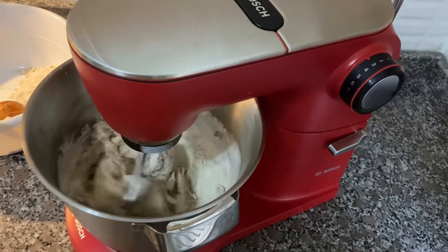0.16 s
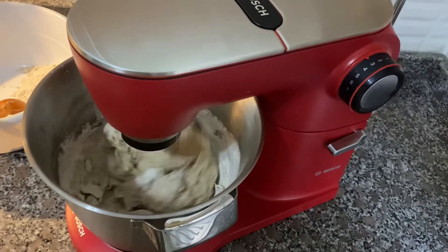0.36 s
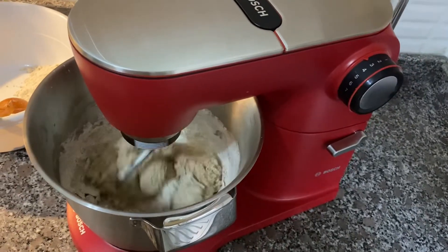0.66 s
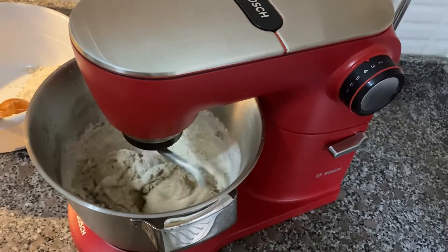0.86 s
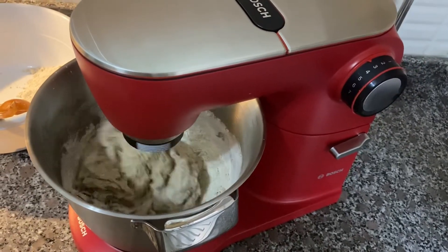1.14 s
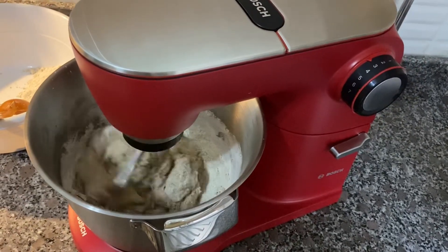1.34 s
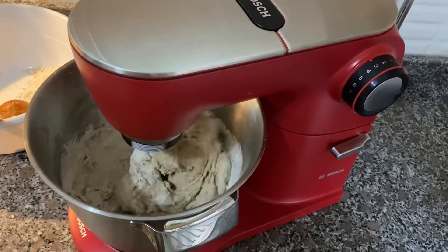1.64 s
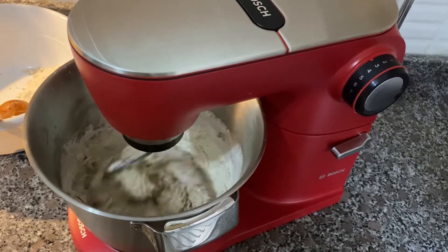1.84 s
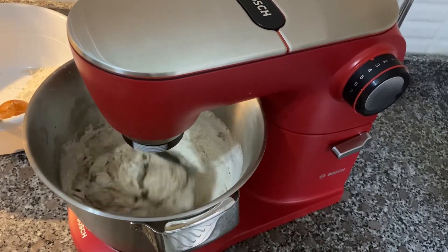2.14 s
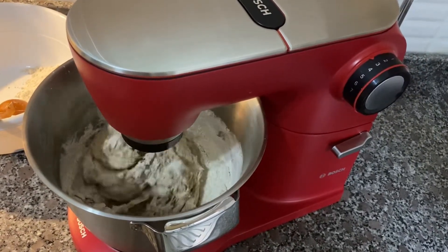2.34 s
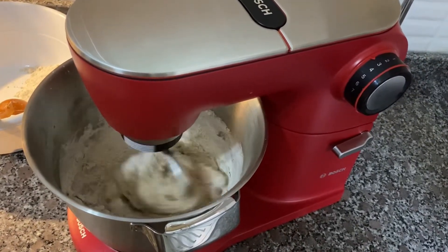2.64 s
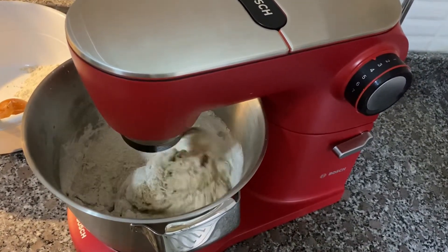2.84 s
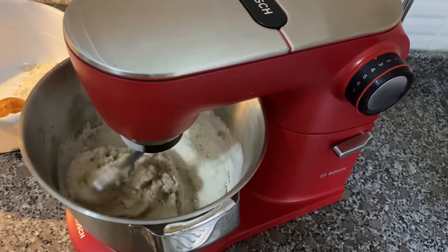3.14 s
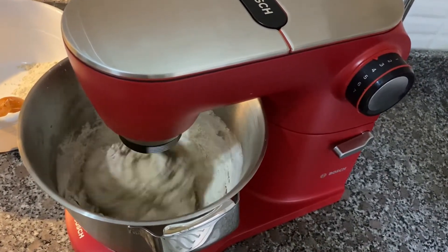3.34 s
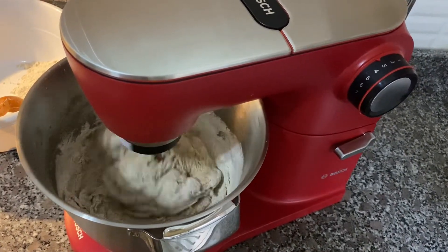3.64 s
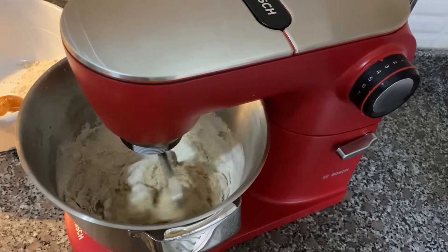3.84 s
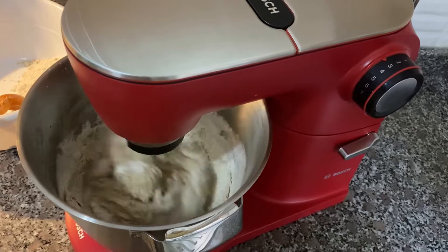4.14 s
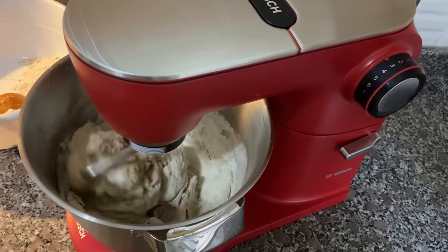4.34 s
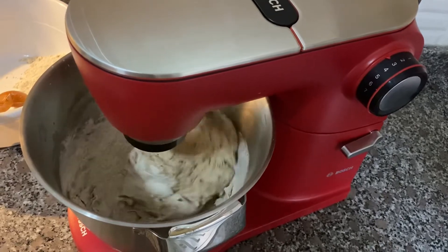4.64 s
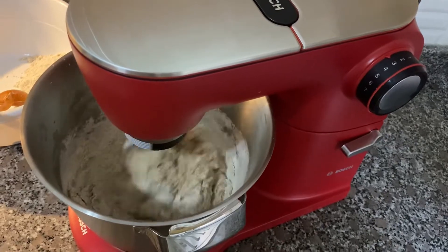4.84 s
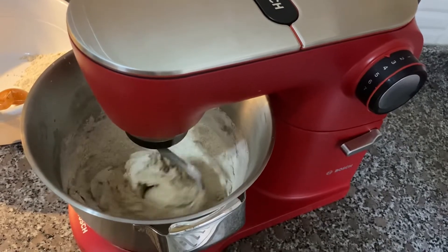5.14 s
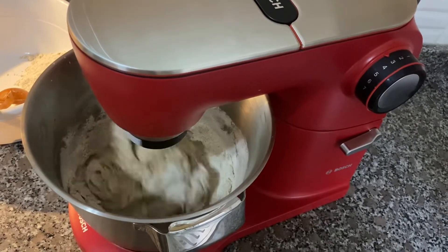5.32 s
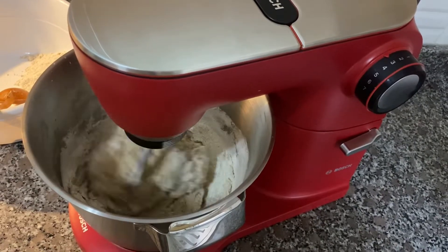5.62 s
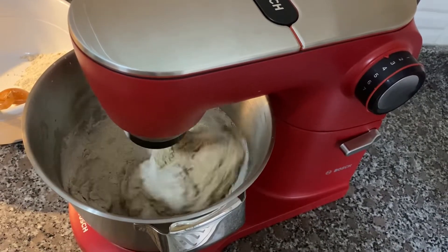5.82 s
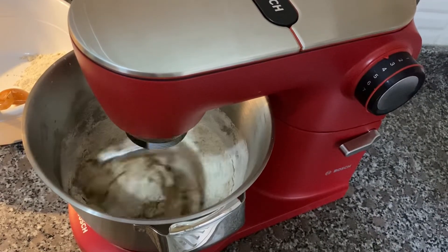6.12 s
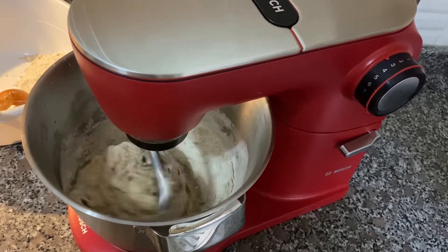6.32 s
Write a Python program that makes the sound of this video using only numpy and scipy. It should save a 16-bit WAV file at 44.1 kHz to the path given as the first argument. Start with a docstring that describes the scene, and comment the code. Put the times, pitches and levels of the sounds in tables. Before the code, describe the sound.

Close-up electric mixer whining at high pitch, sagging and recovering irregularly as heavy dough loads the motor, with low throb and faint bowl ticks.

```python
"""The gear whine of a kitchen stand mixer kneading stiff dough in a steel bowl, heard from just above its head.
Each bite of the hook slows the motor and lowers the whine, which usually swells; when the dough lets go, it rises.
Shaft-locked sines make whine and throb, steady sines the mains hum, and band-shaped noise the gear rattle,
cooling air, brush hiss and soft dough thuds. Damped resonances ring as a few ticks."""
import sys
import numpy as np
from scipy.fft import rfft, irfft, next_fast_len
from scipy.io import wavfile
from scipy.ndimage import map_coordinates

SR = 44100
rng = np.random.default_rng(int(sys.argv[2]) if len(sys.argv) > 2 else 0)


def wav_out(sig):
    """Save sig, one row per channel (or a flat mono array), as 16-bit PCM at SR to the path in sys.argv[1]."""
    wavfile.write(sys.argv[1], SR, np.round(np.clip(np.atleast_2d(sig).T, -1, 1) * 32767).astype(np.int16))


N = 285315  # length in samples

TEETH = 46  # tooth meshes per shaft turn
RIPPLE_HZ = 100  # ripple of the mains current
CHANGE_S = 0.031  # length of a rise or dip
# Likeness of the two sides over frequency: hz, correlation
ALIKE = [(45, 0.64), (100, 0.72), (300, 1), (550, 0.9), (1000, 0.041), (2000, 0.21), (4000, 0.87),
         (6500, 0.053), (9000, 0.033)]
# Phase by which the left side leads: hz, lead_rad
LEAD = [(100, 0.098), (300, -0.25), (550, -0.77), (2000, -0.95), (5500, -1.1), (7000, -0.42)]
# Brief rises and dips of the rattle and the main hum: centre_s, rattle_change_db, main_hum_change_db
BRIEF_CHANGES = [(.11, 5, 5), (.17, 3, 10), (.8, -3, 2.5), (1.08, 2, 6), (1.24, 3.5, -1), (1.3, 5, 6),
                 (1.66, 3, -7), (1.901, 0.5, 9), (2.02, -5, 6), (2.43, 4.5, -5), (2.78, 2, 7), (3.16, 2, 8),
                 (3.359, 6, -1), (3.94, 3, 1), (4.34, 7, -6), (4.63, 3, -3), (5.06, 5, 10), (6.21, -3, 8.5)]


def amp(db):
    """Decibels to gain: 20 dB is a factor of ten in pressure."""
    return 10 ** (np.asarray(db) / 20)


def unit(x):
    """Normalisation to a root-mean-square of 1."""
    return x / np.sqrt(np.mean(x ** 2) + 1e-20)


def along(points, hz):
    """Interpolation of (hz, value) points on a logarithmic frequency axis."""
    f, v = np.transpose(points)
    return np.interp(np.log(hz + 1), np.log(f + 1), v)


def curves(rows):
    """Linear interpolation in time: one value per sample for each column after the time."""
    s, *cols = np.transpose(rows)
    return [np.interp(np.arange(N) / SR, s, c) for c in cols]


def wobble(rate):
    """Band-limited random modulation: a smooth curve through `rate` random knots a second."""
    knots = rng.standard_normal(N // 20)
    return map_coordinates(knots, [np.arange(N) * rate / SR], mode="wrap")


def bell(s, length):
    """Gaussian pulse of height 1 centred at s; `length` is its width in seconds at 1/e of the height."""
    return np.exp(-(2 * (np.arange(N) / SR - s) / length) ** 2)


def filtered(x, response):
    """Linear filtering: the spectrum of x times a response of frequency."""
    m = next_fast_len(N + SR // 4)
    return irfft(rfft(x, m) * response(np.fft.rfftfreq(m, 1 / SR)), m)[..., :N]


def sides(lean_db):
    """Interaural level difference: left and right gains, a positive lean being louder on the left."""
    return amp(np.array([lean_db, -lean_db]).reshape(2, -1) / 2)


def tone(turns, lean_db, lead):
    """Stereo sine, rms 1 before the lean, from its phase in turns; the left side leads by `lead` radians."""
    phase = 2 * np.pi * turns + lead * np.array([[.5], [-.5]])
    return np.sqrt(2) * sides(lean_db) * np.sin(phase)


def spread(pair, spectrum):
    """Partial coherence: two unrelated signals, coloured and mixed to a stereo field of rms 1."""
    # Left-right level difference: hz, lean_db
    lean_points = [(50, -3), (150, -4), (300, 0.5), (600, -7.5), (2000, -2), (4800, -5), (6500, 1.5)]

    def shape(hz):
        turn = np.arccos(np.clip(along(ALIKE, hz), -1, 1)) / 2
        return amp(along(spectrum, hz)) * [np.cos(turn), np.sin(turn)]

    def place(hz):
        return sides(along(lean_points, hz)) * np.exp(1j * along(LEAD, hz) * np.array([[.5], [-.5]]))

    mid, side = filtered(pair, shape)
    return unit(filtered(np.array([mid + side, mid - side]), place))


def late_right(x, stray_db=-16):
    """Time-of-arrival difference: x[0] reaches the right late; unrelated x[1] adds faint opposed scatter."""
    lag_s = 0.0001643
    opposed = np.array([[1], [-1]])
    direct = filtered(x[0], lambda hz: np.exp(1j * np.pi * hz * lag_s * opposed))
    return direct + amp(stray_db) * x[1] * opposed


def kneading():
    """Load slip: each bite drags the tooth-mesh rate (Hz) down and changes the whine's level (dB)."""
    free_hz = 2023.8  # tooth-mesh rate while the hook runs free
    # Bites of the hook into the dough: hardest_pull_s, length_s, mesh_sag_hz, whine_swell_db
    bites = [(0.0, 0.22, 123.8, 4), (0.443, 0.25, 128, 1), (0.788, 0.32, 156.1, 3), (1.161, 0.25, 79.8, 2),
             (1.52, 0.2, 131.6, 3), (1.832, 0.25, 109.2, 3), (2.055, 0.14, 88.5, 1.5),
             (2.363, 0.49, 127.6, 6.5), (2.733, 0.53, 103.7, -1.5), (3.102, 0.22, 140.2, 9.5),
             (3.379, 0.39, 112.2, 3), (3.87, 0.3, 139.8, 5.5), (4.161, 0.34, 146.7, 10),
             (4.335, 0.22, 84.06, 3.5), (4.738, 0.4, 96, 0.5), (5.085, 0.19, 116.9, 6.5),
             (5.447, 0.62, 166.4, 8.5), (5.82, 0.28, 91.96, 4), (6.225, 0.39, 162.1, 7.5)]
    mesh_hz, swell_db = np.full(N, free_hz), np.zeros(N)
    for s, length, sag_hz, db in bites:
        pull = bell(s, length)
        mesh_hz = mesh_hz - sag_hz * pull
        swell_db = swell_db + db * pull ** 2
    return mesh_hz, swell_db


def surging():
    """Periodic strain: the gear train's level (dB) surges once a hook turn, shudders, and briefly rises or dips."""
    hook_hz, first_surge_s, surge_depth_db = 2.67, 0.091, 1.2
    turn = np.cos(2 * np.pi * hook_hz * (np.arange(N) / SR - first_surge_s))
    change_db = sum(db * bell(s, CHANGE_S) for s, db, _ in BRIEF_CHANGES)
    return surge_depth_db * turn + 0.44 * wobble(22.01) + change_db


def beats(shaft):
    """Subharmonic beating (dB): in a judder the teeth press and let go about every second shaft turn."""
    beats_per_turn = 5 / 11
    # Short runs of judder: middle_beat_s, length_s, depth_db
    judders = [(0.179, 0.4, 7), (0.461, 0.42, 8.5), (0.767, 0.44, 3.5), (1.035, 0.22, 1), (1.304, 0.22, 5),
               (1.602, 0.39, 4), (1.95, 0.4, 0), (2.312, 0.39, 4.5), (2.686, .4, 5.5), (3.145, 0.56, -0.5),
               (3.576, 0.19, 5), (4.466, 0.27, 2.5), (4.771, 0.3, 4.5), (5.172, .47, 3.5), (5.601, .35, 2),
               (5.919, .35, 3.5), (6.284, 0.36, 2.5)]
    beat_db = 0
    for s, length, db in judders:
        turns_since = shaft - np.interp(s * SR, np.arange(N), shaft)
        beat_db = beat_db + db * bell(s, length) * np.cos(2 * np.pi * beats_per_turn * turns_since)
    return beat_db


def whine(shaft, load, swell_db):
    """Tooth meshing: pressed teeth sing cleanly; slack teeth flutter, gain sidebands and rasp in their case."""
    whine_db, flutter_db = -40.5, 1.9  # level before swells; random flutter while the teeth are slack
    slack_lean_db, lean_per_swell = 2.5, 0.56  # lean before load; dB moved right per dB of swell
    chop_chance, grip = 0.65, 1.7  # how much chance parts the teeth; how much load closes them
    # Level of the whine's octave: time_s, level_db
    octave_points = [(0, -50), (.6, -56.5), (1.1, -48.5), (1.5, -50), (1.7, -51.5), (2.3, -50), (2.7, -46),
                     (2.85, -63), (3.1, -48), (3.3, -51.5), (3.9, -50.5), (4.2, -46), (4.5, -48),
                     (4.75, -52), (5.2, -53), (5.4, -45), (5.75, -52), (6.1, -49), (6.25, -50), (6.47, -55)]
    # Gear case resonance, relative density: hz, level_db_per_hz
    case_spectrum = [(1500, -20), (1740, 7.5), (1860, 17.5), (1950, 19.5), (2070, -1), (2160, -7),
                     (2400, -56)]
    beat_db = beats(shaft)
    level_db = whine_db + swell_db + flutter_db * (1 - .5 * load) * wobble(26)
    lean_db = slack_lean_db - lean_per_swell * swell_db - 3.3 * load + 3.4 * wobble(23.88)
    octave_db = curves(octave_points)[0] + 2 * wobble(21.8)
    slack = 1 - load
    mesh = TEETH * shaft + (0.14 + 0.027 * slack) * wobble(50) + 0.0058 * wobble(300)

    # the teeth lose contact for moments; a beat presses them together
    contact = 1.5 + np.tanh(grip * load ** 3 + 0.046 * beat_db + chop_chance * wobble(85))
    sing = amp(beat_db) * unit(contact) * tone(mesh, lean_db, lead=-1 + .5 * np.tanh(wobble(7.7)))

    # the rotor's throb shakes slack teeth and adds lines on each side of their tone
    above_turns = mesh + 2 * shaft + 0.2 * wobble(40)
    above = amp(-3.5 - 12.0 * load + 4.3 * wobble(30)) * tone(above_turns, -1.2, lead=-2.23)
    higher_turns = mesh + 4 * shaft + 0.27 * wobble(40)
    higher = amp(-20 - 8.9 * load + 4.1 * wobble(30)) * tone(higher_turns, -1, lead=-1.7)
    below_turns = mesh - 2 * shaft + 0.42 * wobble(40)
    below = amp(-16.0 - 12 * load + 7.1 * wobble(40)) * tone(below_turns, -1, lead=-0.93)
    rasp = amp(-2.0 - 6.5 * load) * spread(rng.standard_normal((2, N)), case_spectrum)
    first = amp(level_db) * (sing + above + higher + below + rasp)

    # the octave is a thin line that comes and goes, roughened at the throb's rate
    broken = 1 + .6 * np.cos(2 * np.pi * (2 * shaft + .2 * wobble(40)))
    scatter = (.16 + .1 * slack) * wobble(45) + .06 * wobble(170)
    octave = tone(2 * TEETH * shaft + scatter, -2.5, lead=-1.05)
    second = amp(octave_db + 3.0 * wobble(50)) * unit(broken) * octave
    return first + second


def gear_hum(shaft, surge_db):
    """Rotating imbalance: the rotor throbs at twice the shaft rate; worn wheels add rough higher orders."""
    # Rotor throb before a 3 dB cut: time_s, level_db
    throb_points = [(0.0, -48.5), (0.03, -36), (0.76, -41), (0.83, -29), (0.89, -48), (0.93, -33),
                    (1.03, -34.5), (1.22, -42), (1.33, -32), (1.49, -43), (1.69, -33), (1.95, -39),
                    (1.96, -30.5), (2.29, -43), (2.72, -30.5), (3.22, -42), (3.28, -47), (3.39, -30),
                    (3.48, -55), (3.51, -36), (3.73, -41), (3.82, -36), (4.05, -32), (4.2, -37),
                    (4.44, -36), (5.12, -38.5), (5.68, -31), (6.02, -39), (6.34, -32), (6.47, -36)]
    # Lines of the shaft and gear wheels before a 1 dB cut: multiple_of_shaft_rate, level_db
    orders = [(3, -52), (4, -53.5), (5, -52.5), (6, -52.5), (7, -46), (8.4, -52), (10.2, -51), (11, -51),
              (13.1, -47), (16, -44.5), (18, -52), (19.5, -48.5), (21.2, -54), (22, -49), (24.2, -54),
              (25.8, -50.5), (38.2, -59), (72, -58.5), (76, -63.5)]
    throb_db, = curves(throb_points)
    throb_turns = 2 * shaft + 0.066 * wobble(24)
    out = amp(throb_db - 3 + 2.6 * wobble(26)) * tone(throb_turns, -3.0, lead=0)
    for multiple, db in orders:
        backlash = .24 * wobble(22) + .07 * wobble(70)
        hz = multiple * shaft[-1] * SR / N  # mean rate of this line
        lead = along(LEAD, hz) + np.arccos(np.clip(along(ALIKE, hz), -1, 1)) * wobble(9)
        level_db = db - 1.0 + .5 * surge_db + 3.6 * wobble(35)
        out = out + amp(level_db) * tone(multiple * shaft + backlash, -1.1, lead)
    return out


def rattle_and_air(shaft, surge_db):
    """Broadband excitation: backlash knocks rattle the housing; the fan blows a rush of air through it."""
    rattle_db, air_db = -38.5, -38.5
    # Housing under the rattle, relative density: hz, level_db_per_hz
    housing_spectrum = [(70, -36), (125, -3), (160, -7), (220, -0.5), (265, -11.5), (310, 8.5), (365, -4.5),
                        (430, -2), (590, -9), (670, -5.5), (850, -12.5), (1070, -5.5), (1200, -49),
                        (2500, -83)]
    # Cooling air, relative density: hz, level_db_per_hz
    air_spectrum = [(300, -7), (900, -0.5), (1200, 1.5), (1400, 5), (1700, -0.5), (2150, 4), (2530, -1.5),
                    (2680, 3), (2880, -4), (3000, 5), (3090, -3), (3200, 3.5), (3330, -2), (3900, -2),
                    (4500, -8.5), (5100, -7), (6200, -17.5), (7600, -11.5), (10000, -46)]
    grain_db = 1.6 * np.cos(2 * np.pi * 3 * shaft + wobble(30)) + 1.4 * wobble(160)
    knocks = rng.standard_normal((2, N)) * amp(grain_db)
    rush = rng.standard_normal((2, N)) * amp(1.15 * wobble(400) + 0.99 * wobble(13))
    rattle = amp(rattle_db + surge_db) * spread(knocks, housing_spectrum)
    return rattle + amp(air_db) * spread(rush, air_spectrum)


def mains_hum():
    """Electromagnetic force: chopped mains current shakes the motor at steady pitches, most at 3 x ripple."""
    main_hum_db = -39.5
    # Weaker electrical lines: multiple_of_ripple, level_db
    weaker_lines = [(1, -47), (2, -60.5), (4, -51.5)]
    ripple = RIPPLE_HZ * np.arange(N) / SR
    change_db = sum(db * bell(s, CHANGE_S) for s, _, db in BRIEF_CHANGES)
    main_db = main_hum_db + 0.94 * wobble(30) + change_db
    out = amp(main_db) * tone(3 * ripple + 0.056 * wobble(30), -7.5, lead=-0.11)
    for k, db in weaker_lines:
        out = out + amp(db + 4.2 * wobble(14)) * tone(k * ripple + 0.084 * wobble(5.7), -0.94, lead=0)
    return out


def squeal(hz, db):
    """Frequency modulation: a thin whistle whose pitch and level waver at random."""
    turns = np.cumsum(hz + 30 * wobble(3.7)) / SR + 0.11 * wobble(130)
    return amp(db + 2.5 * wobble(40)) * tone(turns, 0, lead=0)


def brushes():
    """Sliding contact: brush hiss leaves one vent, with thin whistles in it; now and then the treble flares
    briefly."""
    hiss_db = -54
    whistle_hz, whistle_db = 5940, -63
    peak_s, swell_s, swell_db = 2.5, 0.52, 5.5  # the whistle's single swell
    # Brush hiss, relative density: hz, level_db_per_hz
    hiss_spectrum = [(3500, -29), (5500, 12), (7000, 9.5), (8500, -7.5), (10400, 7), (12000, 8), (13500, 8),
                     (15000, 0.5)]
    # Flares of the hiss: centre_s, length_s, rise_db
    flares = [(1.19, .17, 3.5), (1.59, .05, 3), (4.91, .05, 5), (5.954, 0.051, 5.5), (6.401, 0.095, 0.5)]
    # Faint squeals of the brushes: hz, level_db
    squeals = [(7040, -75), (12250, -74)]
    t = np.arange(N) / SR
    flare_db = sum(db * bell(s, length) for s, length, db in flares)
    spark_db = .5 * np.cos(2 * np.pi * RIPPLE_HZ * t) + 0.59 * wobble(500) + 1.4 * wobble(45)
    sparks = rng.standard_normal((2, N)) * amp(spark_db)
    hiss = unit(filtered(late_right(sparks), lambda hz: amp(along(hiss_spectrum, hz))))
    whistle = squeal(whistle_hz, whistle_db + swell_db * bell(peak_s, swell_s))
    faint = sum(squeal(hz, db + 3 * wobble(3.03)) for hz, db in squeals)
    return amp(hiss_db + .5 * wobble(7.9) + flare_db) * hiss + whistle + faint


def dough():
    """Soft impact: the lump tumbles and slaps round the bowl and thuds at low pitch through the stand."""
    slap_s, tumble_db = 0.085, -55.5  # length of a slap; steady tumbling between slaps
    # Slaps of the lump on the bowl: centre_s, level_db
    slaps = [(.04, -47), (.22, -47), (1.16, -47), (1.46, -49), (2.11, -43), (3.06, -51), (4.2, -58),
             (4.48, -52), (5.25, -50), (5.42, -52), (5.58, -52), (6.15, -47), (6.36, -50)]
    # Thud, relative density: hz, level_db_per_hz
    thud_spectrum = [(15, -41), (28, -17), (38, 14), (48, 25), (60, 12), (90, -11), (200, -56)]
    tumble = amp(tumble_db + 1.2 * wobble(9.2))
    force = tumble + sum(amp(db) * bell(s, slap_s) for s, db in slaps)
    return force * spread(rng.standard_normal((2, N)), thud_spectrum)


def ticks(life=0.0046):
    """Damped resonance: small hard contacts, bursts falling 60 dB in `life` seconds, ring in the bowl."""
    # Ticks in the bowl, peak before the stereo scatter: start_s, peak_db, ring_hz, width_hz
    contacts = [(.807, -43, 6500, 1500), (1.248, -34, 6800, 1000), (2.281, -29, 3900, 1800),
                (3.099, -32, 6950, 600), (3.188, -40, 11000, 1500), (4.164, -31, 7000, 600),
                (4.324, -31, 3400, 1500), (4.898, -39, 11500, 2500), (4.983, -42, 6500, 1500),
                (5.302, -31, 3700, 1500), (5.48, -46, 13500, 3000), (5.762, -42, 11500, 2500),
                (5.981, -34, 6500, 1200), (6.36, -43, 13500, 3000), (6.419, -40, 11500, 2500)]
    out, t = np.zeros((2, N + SR)), np.arange(N) / SR
    count = 4096  # samples per tick
    hz = np.fft.rfftfreq(count, 1 / SR)
    for s, db, ring_hz, width_hz in contacts:
        burst = rng.standard_normal((2, count)) * amp(-60 * t[:count] / life)
        resonance = 1j * hz / (ring_hz ** 2 - hz ** 2 + 1j * hz * width_hz)
        ring = irfft(rfft(burst) * resonance ** 2, count)
        out[:, round(s * SR):][:, :count] += amp(db) * ring / np.abs(ring).max()
    return late_right(out[:, :N])


def scene():
    """Common drive: one shaft turns all the gears, and load grows as the mesh rate falls below a threshold."""
    taut_hz, load_range_hz = 1953, 91  # teeth start to press below this rate; press fully this much lower
    mesh_hz, swell_db = kneading()
    shaft = np.cumsum(mesh_hz) / SR / TEETH  # turns
    load = np.clip((taut_hz - mesh_hz) / load_range_hz, 0, 1)
    surge_db = surging()
    gears = whine(shaft, load, swell_db) + gear_hum(shaft, surge_db) + rattle_and_air(shaft, surge_db)
    return gears + mains_hum() + brushes() + dough() + ticks()


def record(dry):
    """Band limiting: only frequencies below 15.7 kHz pass."""
    return filtered(dry, lambda hz: hz < 15700)


dry = scene()
out = record(dry)
wav_out(out)
```